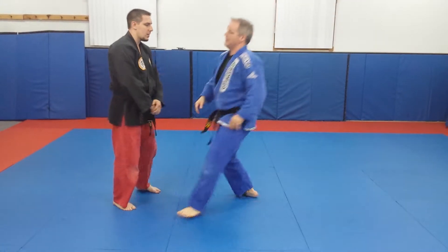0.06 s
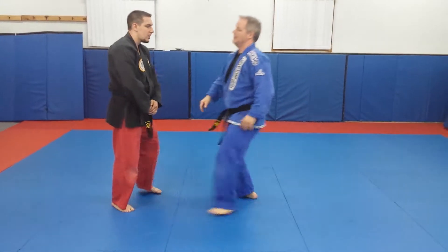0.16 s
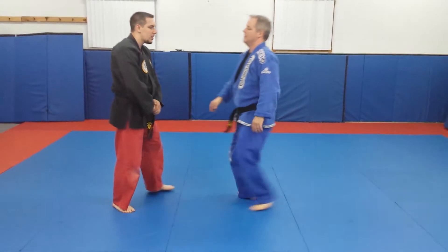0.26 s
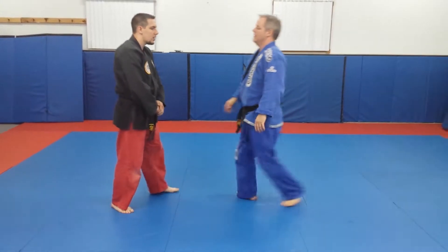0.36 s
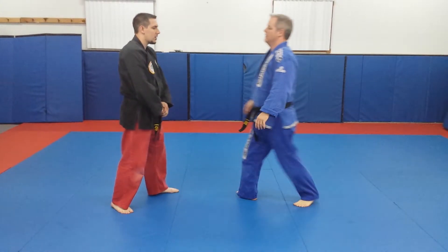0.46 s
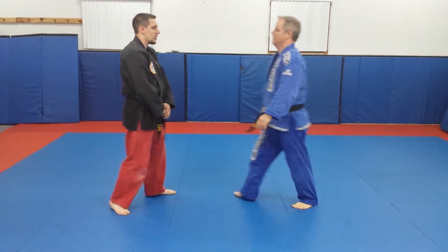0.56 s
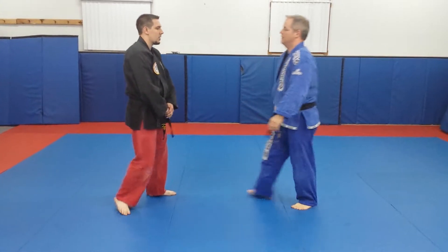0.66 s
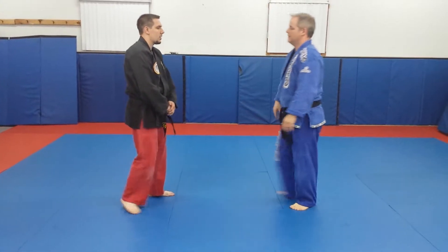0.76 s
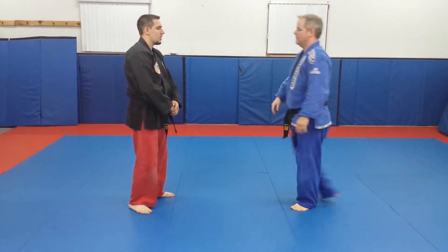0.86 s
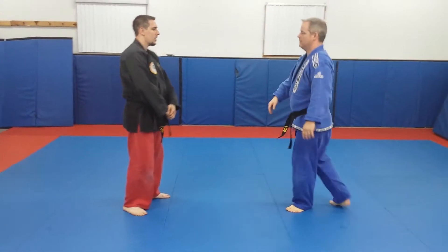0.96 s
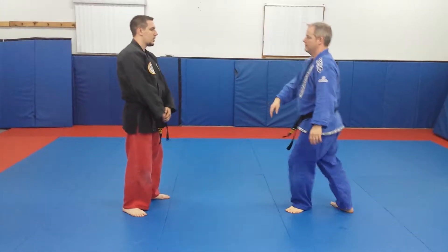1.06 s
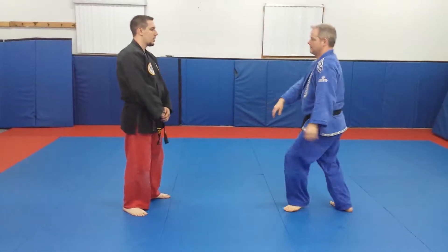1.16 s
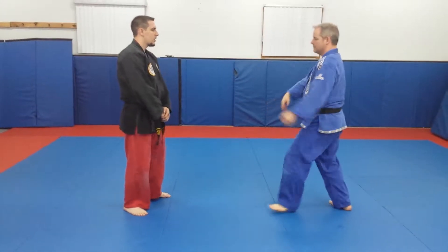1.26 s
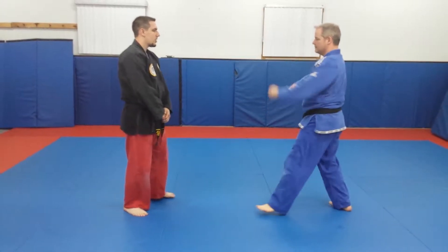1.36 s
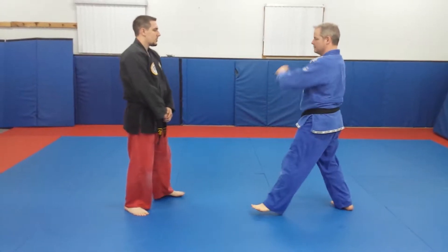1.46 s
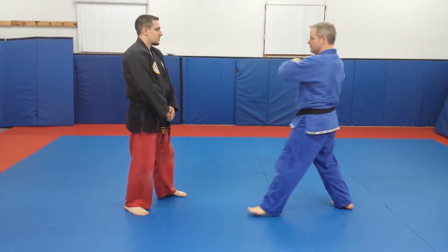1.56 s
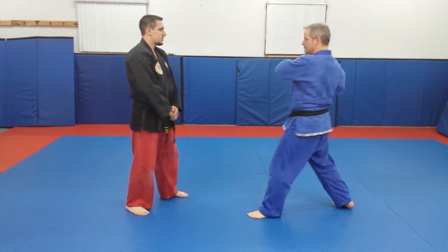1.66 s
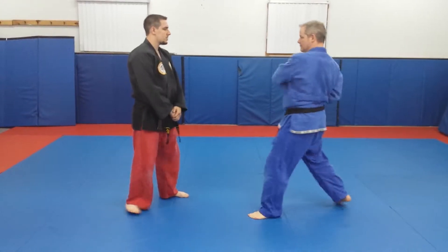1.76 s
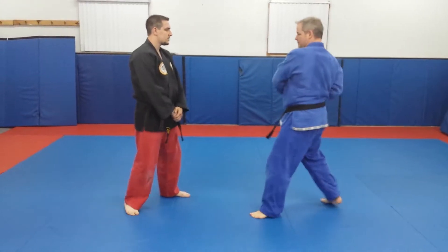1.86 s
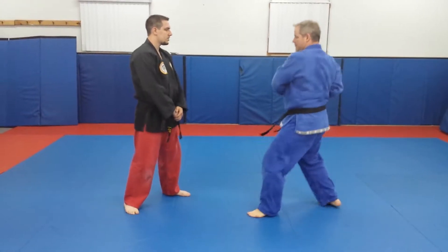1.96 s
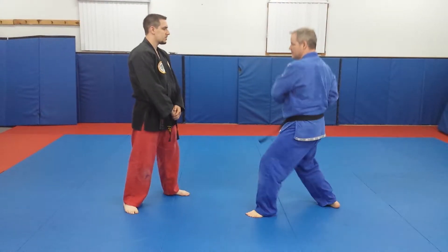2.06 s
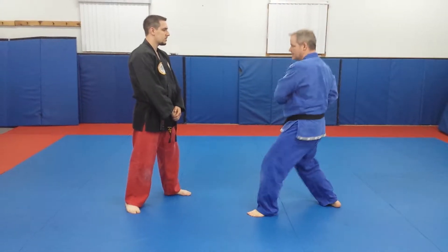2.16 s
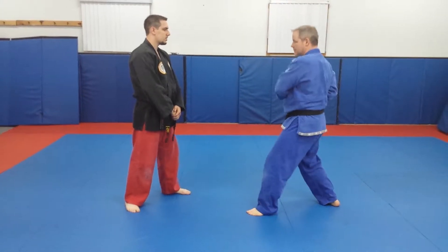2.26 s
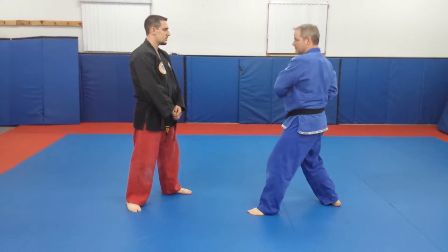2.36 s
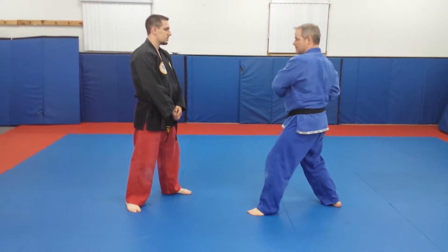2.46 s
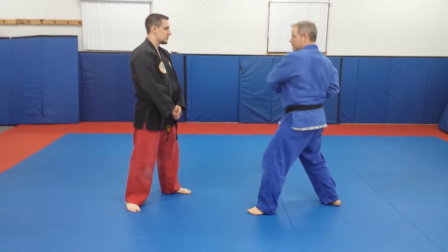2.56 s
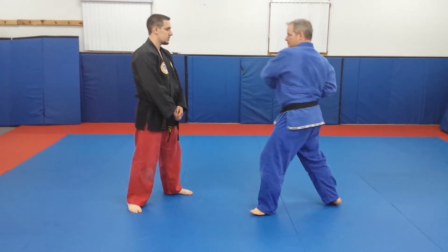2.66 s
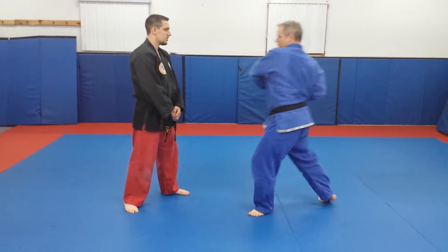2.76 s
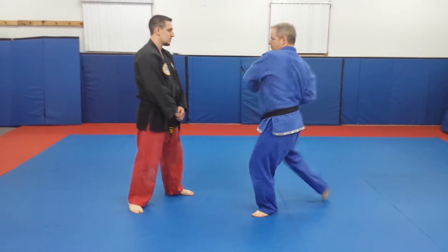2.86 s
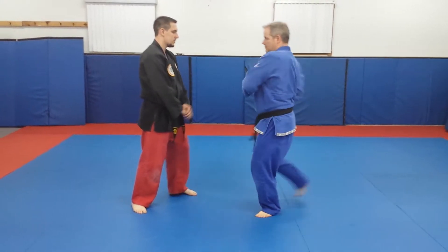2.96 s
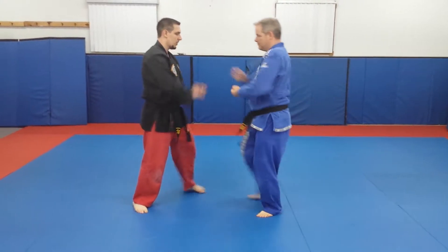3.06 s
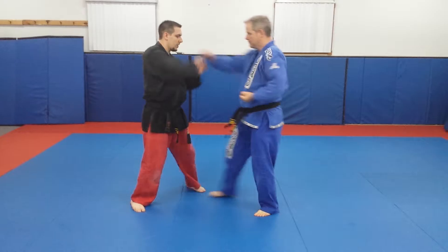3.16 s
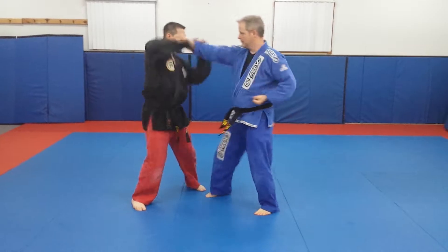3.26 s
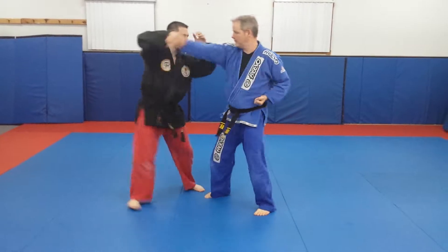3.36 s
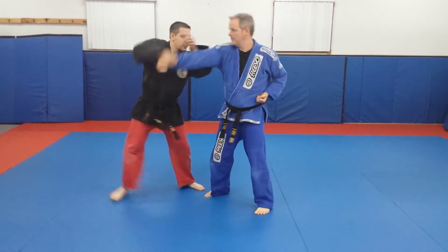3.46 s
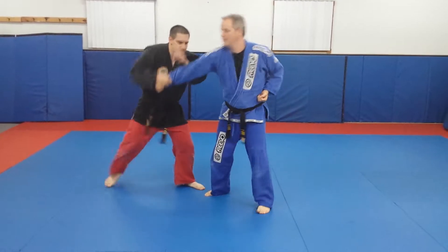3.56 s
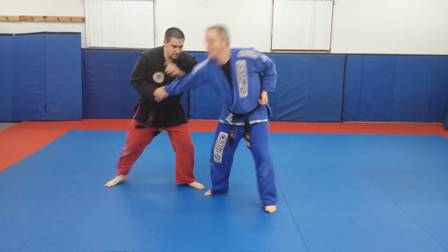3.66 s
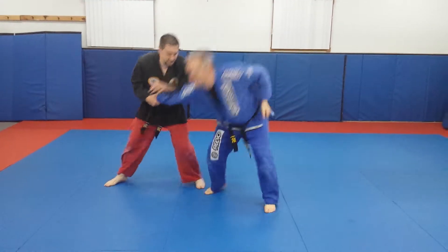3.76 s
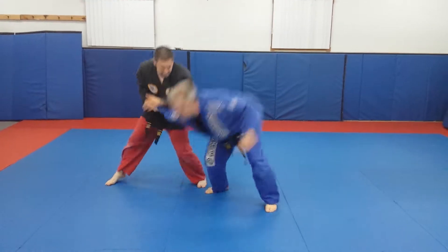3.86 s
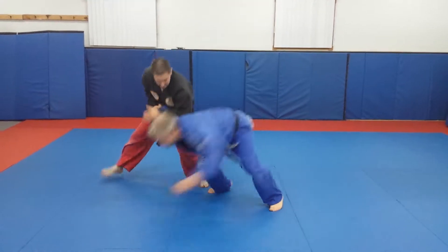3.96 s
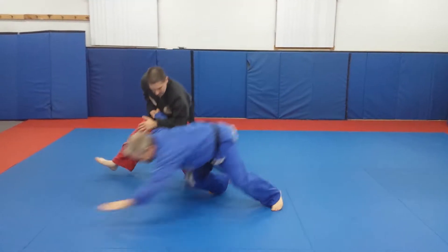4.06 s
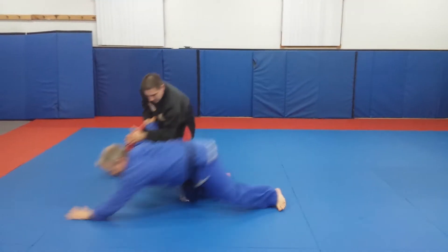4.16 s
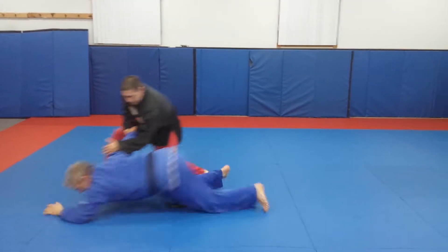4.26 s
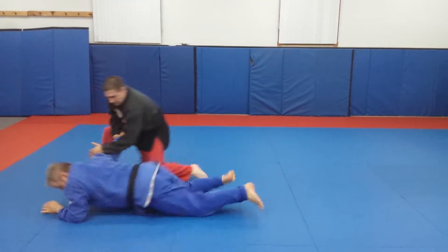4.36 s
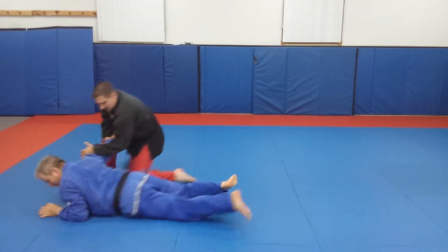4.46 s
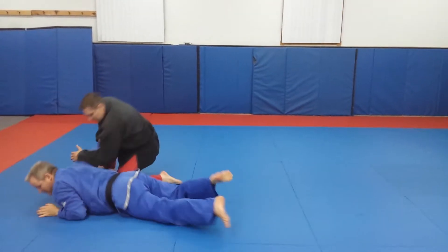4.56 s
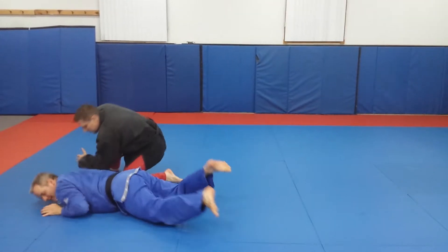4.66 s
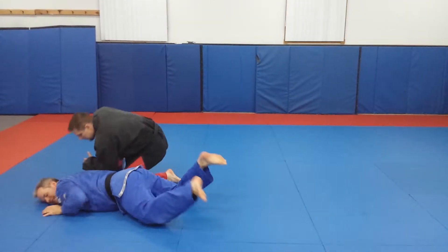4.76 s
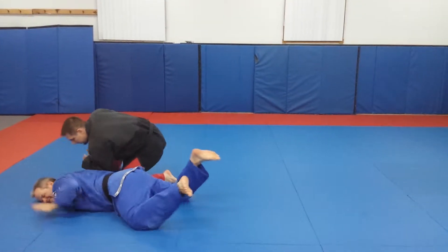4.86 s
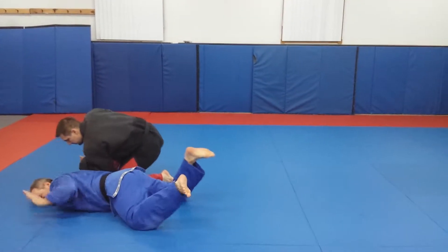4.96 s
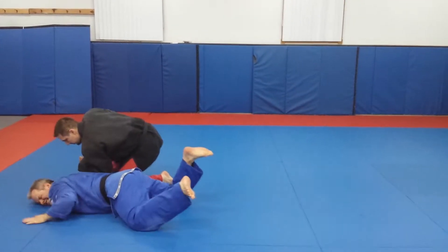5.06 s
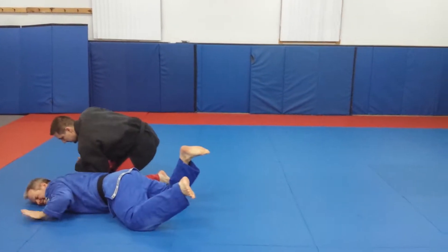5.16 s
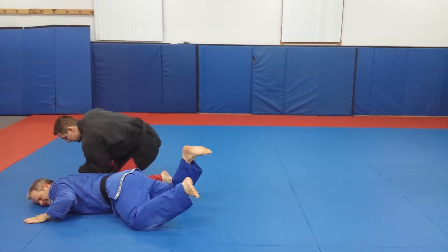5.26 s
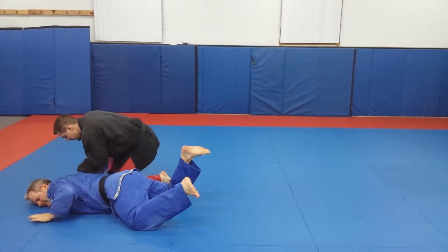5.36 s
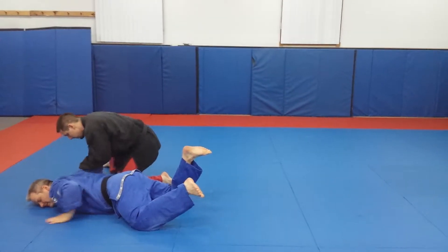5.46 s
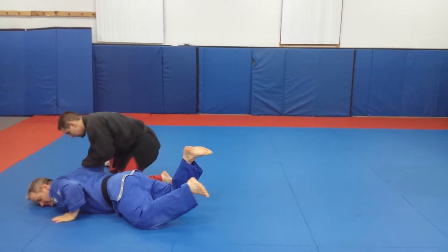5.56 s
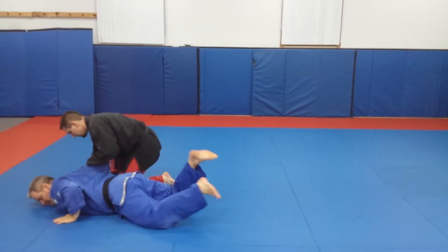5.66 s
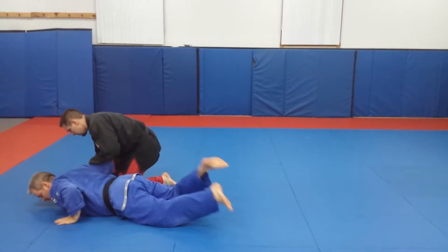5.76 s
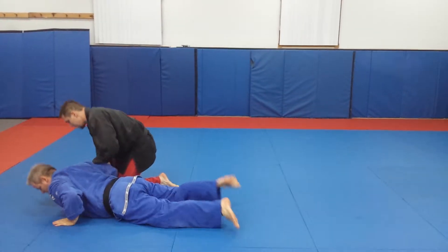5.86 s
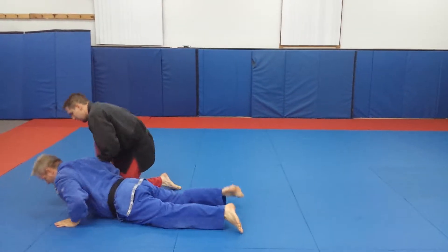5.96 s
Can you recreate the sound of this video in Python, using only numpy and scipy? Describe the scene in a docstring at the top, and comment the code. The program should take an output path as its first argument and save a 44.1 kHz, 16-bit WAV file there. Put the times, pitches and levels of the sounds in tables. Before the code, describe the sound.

In a still, echoing training hall, bare feet scuff and tap lightly on padded mats with rustling heavy cloth. A firm foot plant and quick scuffles lead into a throw: a dense cluster of slaps and body thuds. Small limb knocks follow, then a heavier slap with deep floor thump and another boom right after. Soft cloth slides end it. Stereo microphone a few metres away, loudest hits held down.

```python
"""Bare feet, hands and a thrown body strike padded mats in a hall, over slides, rustling cloth and a still-air hush.
Each contact mixes decaying resonances of joists, floor, body and foam with a clap of trapped air and a skin slap.
Slides are grainy noise with clicking folds of cloth; the hush is steady shaped noise.
The hall is a decaying noise tail: two microphone ports hear alike bass and unrelated treble.
A gain control holds the loudest thuds down."""
import sys
import numpy as np
from scipy import signal
from scipy.fft import rfft, irfft, next_fast_len
from scipy.io import wavfile
from scipy.ndimage import uniform_filter1d, minimum_filter1d, map_coordinates

SR = 44100
rng = np.random.default_rng(int(sys.argv[2]) if len(sys.argv) > 2 else 0)


def store_pcm(level_fs):
    """Save levels as 16-bit WAV."""
    pcm = np.round(np.clip(level_fs, -1, 1) * 32767).astype(np.int16)
    wavfile.write(sys.argv[1], SR, np.atleast_2d(pcm).T)


N = 265391  # length in samples

# still hall, relative spectrum: f/Hz, level/dB
AIR_SPECTRUM = [(15, -35), (25, -11), (33, -27), (64, -4), (284, -11), (437, -11), (710, -15.5),
                (3490, -18.5), (7420, -14), (14200, -28), (15800, -17)]
AIR_DB = -63.5

# decay time of the hall: f/Hz, t60/s
HALL_DECAY = [(60, 0.35), (125, 0.48), (300, 0.69), (1000, 0.89), (3000, 0.95), (7000, 1.004),
              (11000, 0.64), (15000, 0.62)]
# left-right likeness, 1 is identical: f/Hz, correlation
PORT_LIKENESS = [(60, 0.84), (180, 1), (550, 0.8), (1650, -0.23), (4970, -0.024), (15000, 0.11)]
# left port against right: f/Hz, level/dB
PORT_BALANCE = [(60, -2), (99, 1), (160, 2.5), (270, 1), (450, 2), (740, 1), (1220, 2), (2010, 1),
                (3330, 2.5), (5500, 2), (9080, -11.5), (15000, -12.5)]
# direct sound and the nearest walls, relative: delay/s, level/dB
WALL_ARRIVALS = [(0, 13), (.009, 7), (0.024, -3)]
SMEAR_S = 0.01  # each arrival starts at once and falls 60 dB in this time

# slides of feet and cloth, before the hall: start t/s, hold t/s, hiss level/dB, cloth drag level/dB
SLIDES = [(-0.1, 0.084, -42, -49), (0.1, 0.019, -39.5, -52.5), (0.469, 0.074, -48, -60),
          (0.614, 0.077, -45.5, -56.5), (0.742, 0.24, -42.5, -56), (1.015, 0.12, -45.5, -57),
          (1.204, 0.21, -46, -59.5), (1.51, 0.18, -49, -59), (1.647, .07, -45, -59.5),
          (1.796, 0.045, -33.5, -50), (1.927, .17, -46.5, -56.5), (2.657, 0.23, -57, -65),
          (2.934, 0.051, -46, -50), (3.056, 0.18, -42.5, -51), (3.27, 0.21, -44, -51),
          (3.56, 0.089, -34.5, -47.5), (3.703, 0.21, -42.5, -45), (3.993, 0.19, -48.5, -48.5),
          (4.44, 0.15, -36.5, -39.5), (4.753, .17, -44, -50), (5.004, 0.09, -56, -59),
          (5.538, 0.093, -47, -56.5), (5.748, 0.185, -50, -57.5), (5.928, .1, -48.5, -53)]
# skin and cloth hiss, relative spectrum: f/Hz, level/dB
HISS_SPECTRUM = [(260, -1.5), (450, -20), (736, -7), (933, -4), (1440, -6), (2350, -1.5), (4520, -6),
                 (6090, -1), (7500, 3), (9380, -11), (11600, -12.5), (14900, -13), (15800, -18)]
# low cloth drag, relative spectrum: f/Hz, level/dB
DRAG_SPECTRUM = [(110, -32), (180, -5.5), (210, -9), (366, -0.5), (399, -8), (700, -12.5), (910, -16),
                 (1540, -120)]
SLIDE_ATTACK_S, SLIDE_FADE_DB_PER_S = 0.017, 125
GRAIN_PER_S, RUSTLE_PER_S, SWAY_PER_S = 147, 14, 6  # knots of each random curve
CATCH_DB, RUSTLE_DB = 1.5, 3.5  # depth of the fine grain and of the slower rustle
WEIGHT_DB, WEIGHT_SWAY_DB = -3, 5  # shifting weight against the drag, depth of its slow sway
TICKS_PER_S = 40  # stiff folds of cloth flicking over
TICK_DB, TICK_SPREAD_DB = 11, 4  # smallest tick against the hiss, scale of the scatter above it

# feet, hands and limbs on the mat, before the hall: t/s, skin slap level/dB, hollow clap level/dB,
# floor thump level/dB, torso thud level/dB, first snap against its echo level/dB
CONTACTS = [(0.105, -48.5, -57, -55.5, -67, -5), (0.534, -65, -83, -57, -74, -8),
            (0.632, -49.5, -56, -57, -63, -15), (0.773, -64, -66, -68, -61.5, 0),
            (1.043, -60, -61, -48, -61, -12), (1.261, -52.5, -72, -59.5, -66, -24),
            (1.684, -53.5, -68, -50, -59.5, 1.5), (1.820, -44, -53.5, -53, -65, -14),
            (2.121, -60, -60, -55, -55.5, -2), (2.650, -64, -79, -90, -84, -19),
            (2.927, -54.5, -58.5, -65, -61.5, -6), (3.225, -51, -60, -53, -61, -9),
            (3.281, -51, -54.5, -37, -46, -2), (3.447, -45.5, -54, -66, -58, -7),
            (3.570, -47.5, -60, -73, -90, -16), (3.588, -60, -72, -67, -55, -8),
            (3.691, -68, -61, -52, -53, 6), (3.786, -43, -53, -55, -53, -4),
            (3.920, -59, -58, -50, -51, -11), (4.233, -46.5, -41, -32.5, -39.5, -7),
            (4.260, -35.5, -39.5, -31, -36, -8), (4.267, -27, -27.5, -36, -23, -13.5),
            (4.281, -27.5, -36, -32, -26, -7), (4.311, -31.5, -46, -29.5, -25.5, -18),
            (4.360, -33.5, -40, -43, -31, -13), (4.691, -40, -49.5, -68, -42, -20),
            (4.830, -42.5, -65, -55, -55.5, -11.5), (5.136, -19.5, -29.5, -12.5, -20, -10),
            (5.160, -23.5, -49, -19.5, -23.5, -3), (5.300, -33, -55, -20, -32, -2.5),
            (5.309, -37, -45, -32.5, -34, 3)]
# beams under the floor: f/Hz, width/Hz, level/dB
JOIST_MODES = [(63.4, 35, 0)]
# sprung floor: f/Hz, width/Hz, level/dB
FLOOR_MODES = [(129, 48, 0)]
# torso and limbs: f/Hz, width/Hz, level/dB
BODY_MODES = [(260, 94, 0)]
# foam under its cover, level of each of two passes: f/Hz, width/Hz, level/dB
PADDING_MODES = [(342.4, 73, 14.5), (514, 82, 2)]
# air trapped under palm or sole, relative: f/Hz, width/Hz, level/dB
CUP_MODES = [(506, 227, -8), (828, 105, -5), (1006, 135, -3.5), (1300, 445, -15.5)]
# skin slap, also the folds of cloth, relative spectrum: f/Hz, level/dB
SLAP_SPECTRUM = [(710, -34), (1200, -4), (1680, -7), (2750, -1), (4100, -7), (5490, -2), (7590, -3),
                 (9120, -13), (12700, -22), (14500, -20), (15800, -27)]
BOOM_DB, BOOM_GROWS = -33.5, 0.69  # joists follow the floor thump, more slowly (dB, dB per dB)
KNOCK_DB = -8  # padding against the torso thud
SHEEN_DB, SHEEN_FALLS = -25.5, -0.45  # top of a slap: heavier is duller (dB, dB per dB of thud)
SHEEN_HZ = 9000  # corner of the sheen

LIMIT_DB, SQUEEZE, LIMIT_HOLD_S = -6, 0.64, 0.0089  # threshold, share of dB taken off above it, hold
TOP_HZ = 15870  # band limit


def amp(db):
    """Gain of a level in dB."""
    return 10 ** (np.asarray(db) / 20)


def unit(x):
    """Scaled to rms 1."""
    return x / np.sqrt(np.mean(x ** 2) + 1e-20)


def along(points, hz):
    """Values between (Hz, value) points on a log frequency axis."""
    f, v = np.transpose(points)
    return np.interp(np.log(hz + 1), np.log(f + 1), v)


def filtered(x, response):
    """x times a complex response of frequency."""
    m = next_fast_len(x.shape[-1] + 8192)
    spectrum = rfft(x, m) * response(np.fft.rfftfreq(m, 1 / SR))
    return irfft(spectrum, m)[..., :x.shape[-1]]


def modes(table):
    """Causal response of damped resonances, summed with alternating sign."""
    def response(f):
        return sum((-1) ** k * amp(db) * 1j * f * width / (centre ** 2 - f * f + 1j * f * width)
                   for k, (centre, width, db) in enumerate(table))
    return response


def twice(table):
    """The resonances passed through twice, as padding and board filter in turn."""
    return lambda hz: modes(table)(hz) ** 2


def coloured(spectrum, size):
    """Noise of rms 1 with the given spectrum."""
    return unit(filtered(rng.standard_normal(size), lambda hz: amp(along(spectrum, hz))))


def causal(spectrum, size):
    """The shortest (minimum-phase) click with the given spectrum, by folding its cepstrum."""
    log_gain = np.log(amp(along(spectrum, np.fft.rfftfreq(size, 1 / SR))) + 1e-6)
    ceps = irfft(log_gain, size)
    ceps[1:size // 2] *= 2
    ceps[size // 2 + 1:] = 0
    return irfft(np.exp(rfft(ceps)), size)


def wobble(rate):
    """A smooth random curve through knots at this rate a second."""
    knots = rng.standard_normal(int(N * rate / SR) + 4)
    return map_coordinates(knots, [np.arange(N) * rate / SR])


def paired(z, hz):
    """Two unrelated spectra mixed into a left and right of the hall's likeness."""
    turn = np.arccos(np.clip(along(PORT_LIKENESS, hz), -1, 1))[:, None] / 2
    shared, opposed = np.cos(turn) * z[0], np.sin(turn) * z[1]
    return np.array([shared + opposed, shared - opposed])


def hall(x, first, delay_s):
    """The first arrivals, then a fresh noise tail in which each frequency dies at its own speed."""
    hz, t, z = signal.stft(rng.standard_normal((2, SR)), SR, nperseg=512)
    t60 = along(HALL_DECAY, hz)[:, None]
    decay = amp(-60 * t / t60) / np.sqrt(t60)
    tail = signal.istft(paired(z, hz) * decay, SR, nperseg=512)[1]
    tail *= np.clip(np.arange(tail.shape[1]) / SR / delay_s, 0, 1)  # reflections build up
    tail /= np.linalg.norm(tail[0])
    tail[:, :first.shape[1]] += first
    return signal.fftconvolve(x[None], tail, axes=1)


def arrivals(db):
    """Treble reaches each port as short ragged bursts, straight and off the nearest walls."""
    t = np.arange(SR // 20) / SR
    shape = sum((t >= delay) * amp(level - 60 * np.abs(t - delay) / SMEAR_S)
                for delay, level in WALL_ARRIVALS)
    bursts = shape * rng.standard_normal((2, len(t)))
    return amp(db) * bursts / np.linalg.norm(bursts[0])


def air():
    """The steady hush of the still hall: shaped noise, alike at the ports only in the bass."""
    noise = np.array([coloured(AIR_SPECTRUM, N), coloured(AIR_SPECTRUM, N)])
    hz, _, z = signal.stft(noise, SR, nperseg=512)
    return amp(AIR_DB) * signal.istft(paired(z, hz), SR, nperseg=512)[1][:, :N]


def slide_levels():
    """Hiss and drag envelopes: each slide swells, holds and fades; overlaps add in power."""
    t = np.arange(0, N, SR // 1000) / SR
    start, hold, hiss_db, drag_db = np.transpose(SLIDES)[..., None]
    attack = np.clip((t - start) / SLIDE_ATTACK_S, 0, 1)
    fading_s = np.clip(t - start - SLIDE_ATTACK_S - hold, 0, None)
    shape = attack * amp(-SLIDE_FADE_DB_PER_S * fading_s)
    return [np.interp(np.arange(N) / SR, t, np.linalg.norm(amp(db) * shape, axis=0))
            for db in (hiss_db, drag_db)]


def cloth_ticks():
    """Stiff folds of cloth flick over at random, each a short click."""
    sizes_db = TICK_DB + TICK_SPREAD_DB * rng.exponential(size=N).clip(max=3)
    ticks = (rng.random(N) < TICKS_PER_S / SR) * amp(sizes_db)
    fold = causal(SLAP_SPECTRUM, size=512)
    return signal.fftconvolve(ticks, fold / np.linalg.norm(fold))[:N]


def rubbing():
    """Skin and cloth catch and slip on the mat cover in uneven grains; shifting weight works the floor."""
    hiss, drag = slide_levels()
    catch_db = CATCH_DB * wobble(GRAIN_PER_S) + RUSTLE_DB * wobble(RUSTLE_PER_S)
    grain = unit(amp(catch_db) * coloured(HISS_SPECTRUM, N)) + cloth_ticks()
    floor_noise = unit(filtered(rng.standard_normal(N), twice(FLOOR_MODES)))
    weight = amp(WEIGHT_DB + WEIGHT_SWAY_DB * wobble(SWAY_PER_S)) * floor_noise
    rub = hiss * grain + drag * (coloured(DRAG_SPECTRUM, N) + weight)
    out, step = np.zeros((2, N + 2 * SR)), SR // 4
    for at in range(0, N, step):  # the movers change place, so each quarter second gets a fresh tail
        wet = hall(rub[at:at + step], amp([[-6], [-6]]), delay_s=0.0015)
        out[:, at:][:, :wet.shape[1]] += wet
    return out[:, :N]


def skin(sheen_db):
    """Shelf on the top of a slap: a lighter contact has more sheen."""
    return lambda hz: 1 + (amp(sheen_db) - 1) * hz ** 4 / (hz ** 4 + SHEEN_HZ ** 4)


def contacts():
    """Each contact: a soft push into joists, floor, body and foam, a puff of trapped air and a skin slap."""
    out, t = np.zeros((2, N + 2 * SR)), np.arange(8192) / SR
    push = t / 0.0005 * np.exp(-t / 0.0004)  # peaks at 0.4 ms
    boom, thump, thud, knock = (unit(filtered(push, twice(table)))
                                for table in (JOIST_MODES, FLOOR_MODES, BODY_MODES, PADDING_MODES))
    click = unit(causal(SLAP_SPECTRUM, size=8192))
    clap = unit(filtered(1. * (t == 0), modes(CUP_MODES)))
    for s, slap_db, clap_db, thump_db, thud_db, snap_db in CONTACTS:
        slap = filtered(click, skin(SHEEN_DB + SHEEN_FALLS * thud_db))
        low = amp(BOOM_DB + BOOM_GROWS * thump_db) * boom + amp(thump_db) * thump
        low = low + amp(thud_db) * (thud + amp(KNOCK_DB) * knock)
        high = amp(clap_db) * clap + amp(slap_db) * slap
        wet = hall(low, amp([[-3], [-3]]), delay_s=0.0064)
        wet = wet + hall(high, arrivals(snap_db), delay_s=0.0025)
        out[:, round(s * SR):][:, :wet.shape[1]] += wet
    return out[:, :N]


def scene():
    """All sources at the two ports."""
    return air() + rubbing() + contacts()


def record(dry):
    """The left port has a duller top; the gain control rides down loud thuds; a band limit cuts the top."""
    ports = filtered(dry, lambda hz: amp(np.outer([.5, -.5], along(PORT_BALANCE, hz))))
    over = np.maximum(np.abs(ports).max(axis=0) / amp(LIMIT_DB), 1)
    hold = round(LIMIT_HOLD_S * SR)
    held = minimum_filter1d(over ** -SQUEEZE, hold, origin=(hold - 1) // 2)
    gain = uniform_filter1d(held, hold // 2)
    return filtered(gain * ports, lambda hz: hz < TOP_HZ)


dry = scene()
out = record(dry)
store_pcm(out)
```